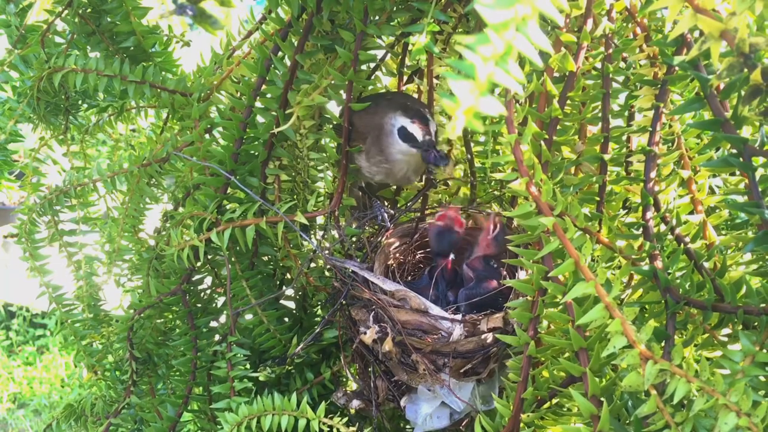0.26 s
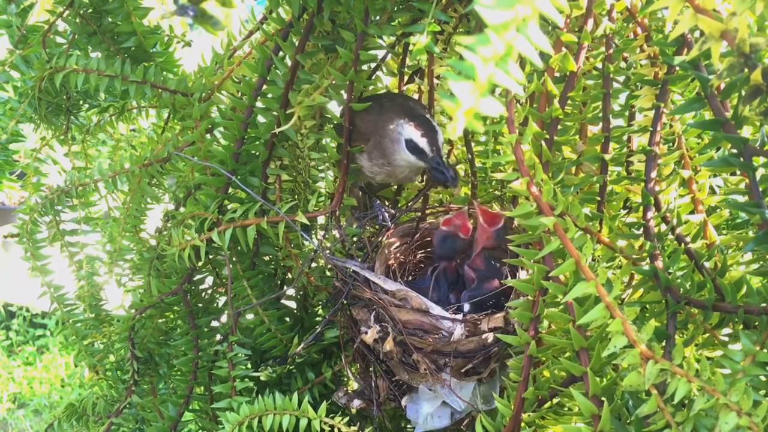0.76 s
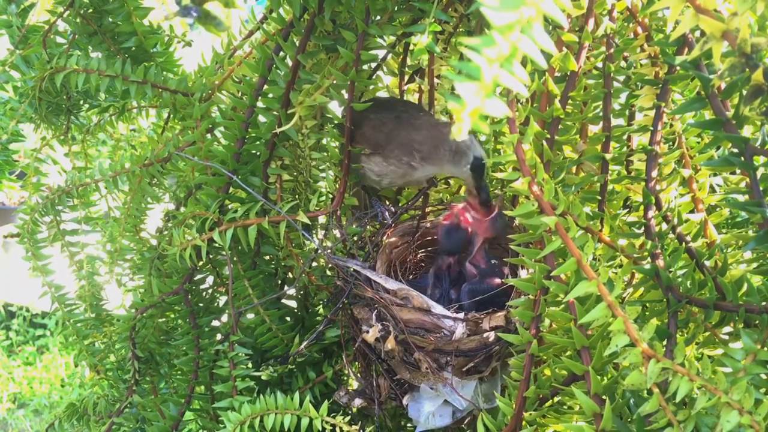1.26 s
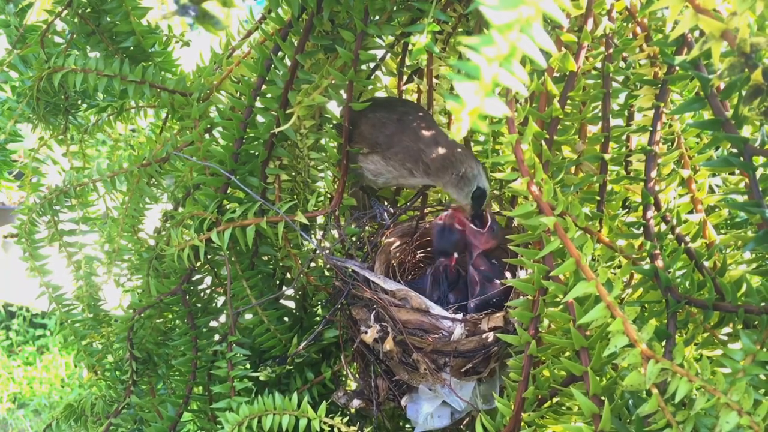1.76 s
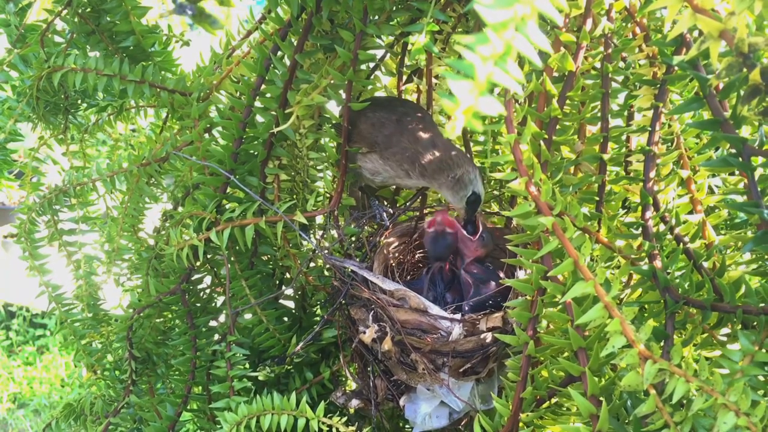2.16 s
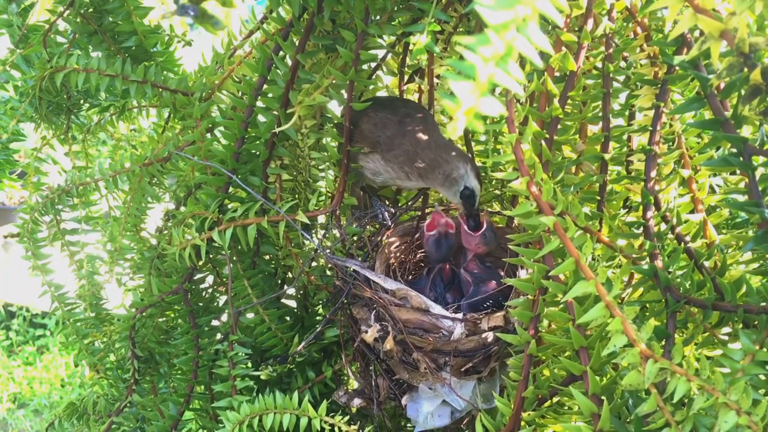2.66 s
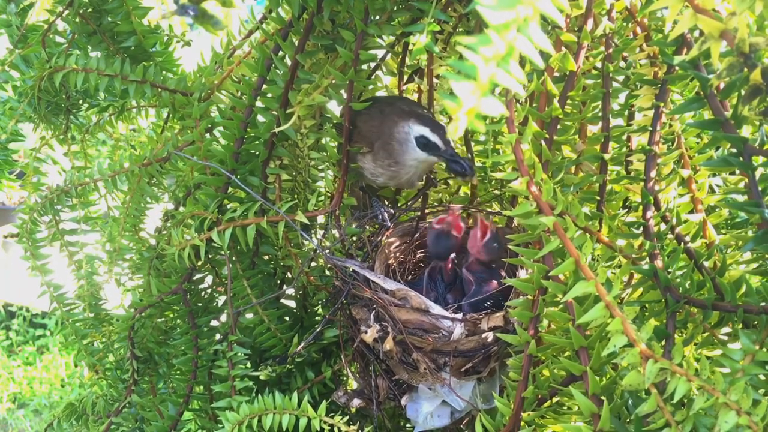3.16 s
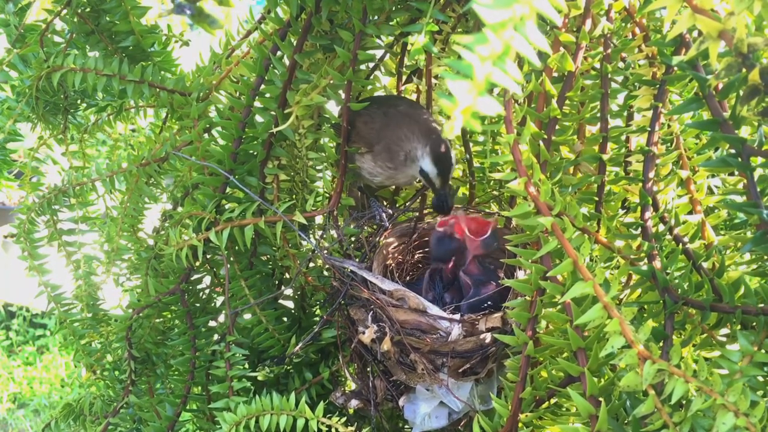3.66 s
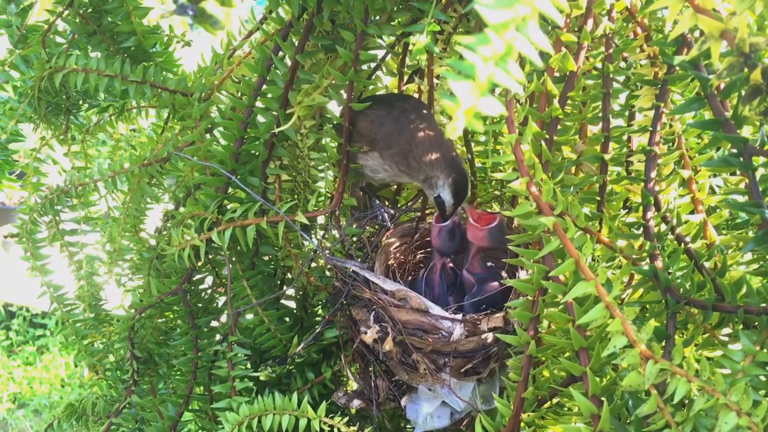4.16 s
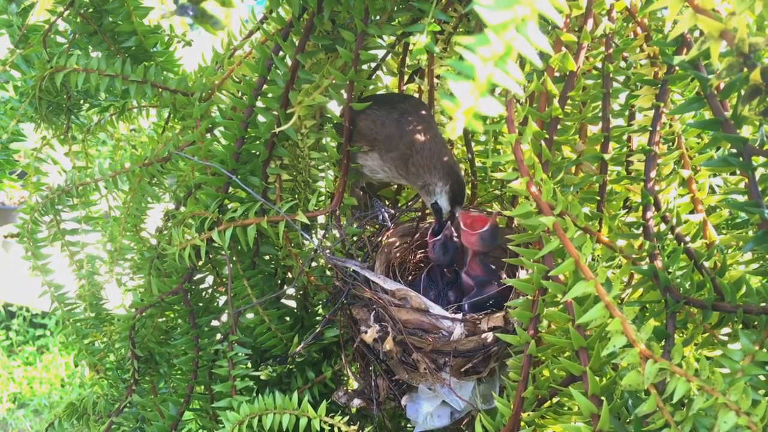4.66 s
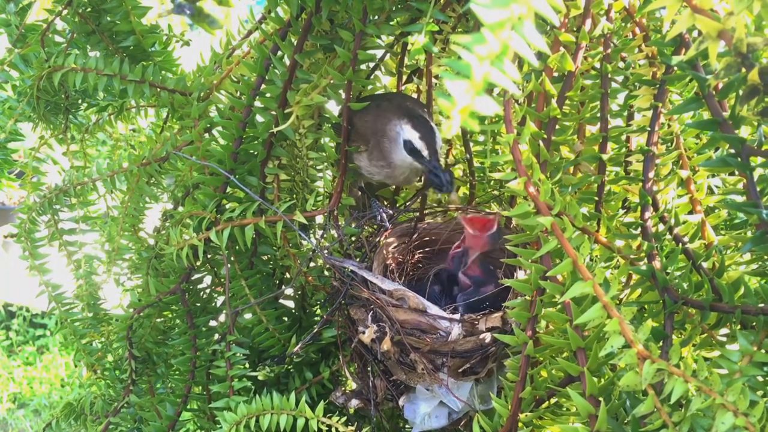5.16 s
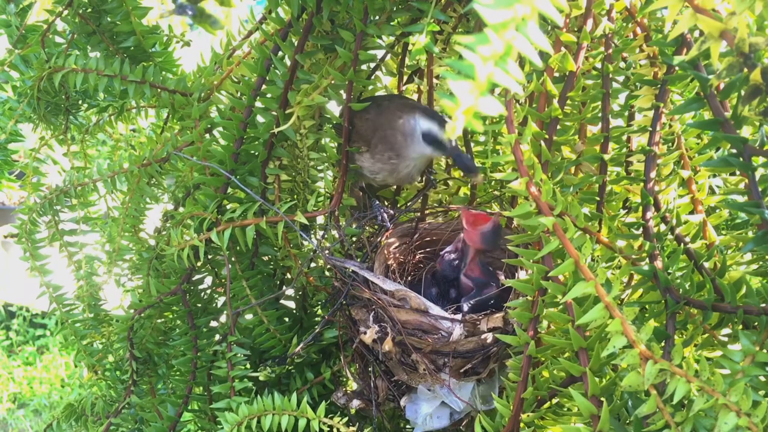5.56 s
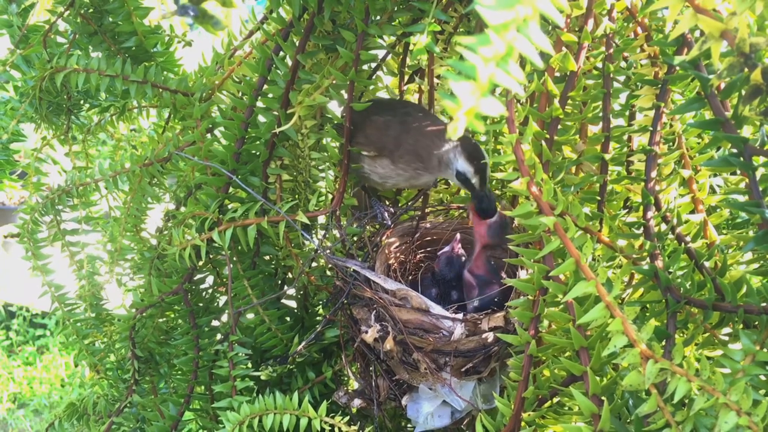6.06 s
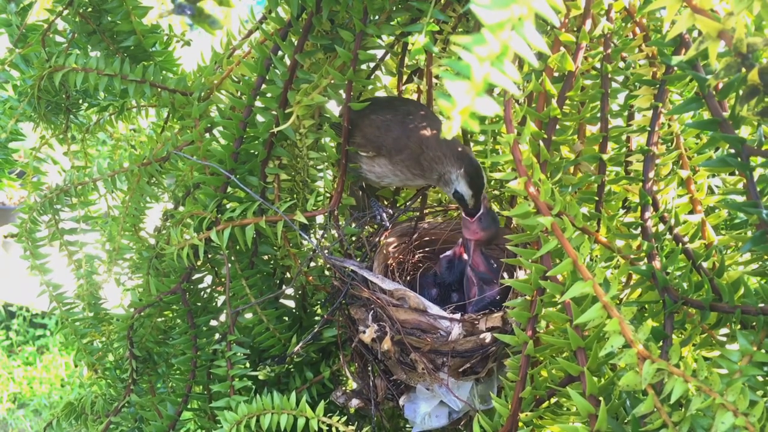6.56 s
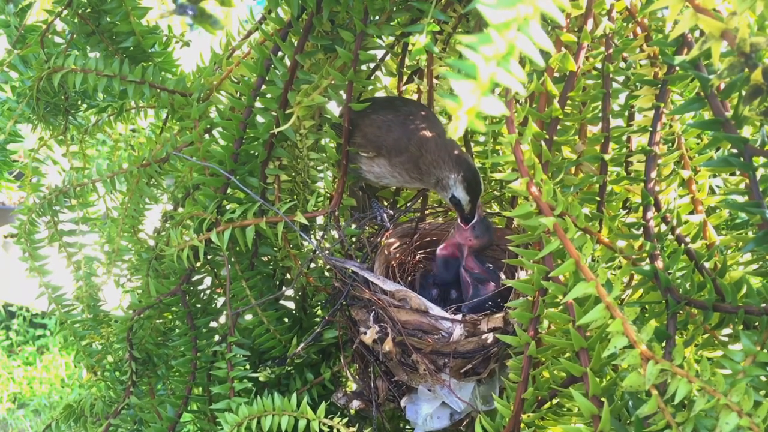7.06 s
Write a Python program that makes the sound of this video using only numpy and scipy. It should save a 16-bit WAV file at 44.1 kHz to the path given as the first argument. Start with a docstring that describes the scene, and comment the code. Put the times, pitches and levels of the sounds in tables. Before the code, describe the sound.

Close high-pitched begging from baby birds rises in quick squeaks, with faint leaf rustles, one dry click, distant engine rumble and steady fast ticking.

```python
"""Over a low outdoor rumble with an engine drone (noise and a gliding sine) and a steady hiss (shaped noise), a
buzz pulses ten times a second: one cycle of damped rings and noise, repeated. Ferns rustle (noise bursts), then
nestlings beg as a parent feeds them: two beating voices climb from a faint rasp to a thin whistle. Softer
wavering peeps of two voices come between the calls. One long, fluttering sine whistle then falls for two
seconds; later comes one dry click, a pair of damped rings."""
import sys
import numpy as np
from scipy import signal
from scipy.fft import rfft, irfft, next_fast_len
from scipy.io import wavfile
from scipy.ndimage import uniform_filter1d, map_coordinates

SR = 44100
rng = np.random.default_rng(int(sys.argv[2]) if len(sys.argv) > 2 else 0)


def log_audio(samples):
    """Write samples as a 16-bit WAV file to the path given in sys.argv[1]."""
    # one column per channel
    frames = np.atleast_2d(samples).T
    # limit to full scale, then quantise
    limited = np.clip(frames, -1, 1)
    pcm = np.round(limited * 32767).astype(np.int16)
    wavfile.write(sys.argv[1], SR, pcm)


N = 322812
T = np.arange(N) / SR  # s

# level curve of the low rumble: time_s, relative_level_db
RUMBLE_LEVEL = [(0.0, -32.5), (0.15, -32), (0.45, -37), (0.9, -31.5), (1.75, -35), (2.1, -31), (2.3, -36.6),
                (2.6, -32), (2.8, -36.5), (3.0, -31.9), (4.61, -38), (4.81, -30.5), (5.06, -36),
                (5.81, -36.5), (6.21, -32), (6.86, -36), (7.06, -33.5), (7.31, -33.5)]
# distant engine: time_s, pitch_hz (before a small drift), level_db (before a slow wavering)
ENGINE_DRONE = [(0, 63.1, -35.5), (1.2, 62.3, -33), (1.6, 65.66, -39.5), (2.1, 66, -32.5), (2.5, 64, -48),
                (3.3, 64.86, -34.5), (3.8, 66.24, -43.5), (6.6, 65.97, -59), (7.3, 66, -40)]
# noise spectra of the rumble, the low wash of the surroundings, the air and the hiss:
# frequency_hz, relative_density_db (per Hz)
RUMBLE_SPECTRUM = [(22, -27), (31, -18), (46, -4.5), (90, 0), (125, -8.5), (200, -26)]
WASH_SPECTRUM = [(110, -0.5), (145, -2), (200, -7), (255, -15), (380, -17.5), (480, -34.5)]
AIR_SPECTRUM = [(400, 5), (700, 2.5), (790, 4), (900, 3.5), (1300, 2.5), (1600, -2.5), (2200, 5.5),
                (2650, -1.5), (3500, -0.5), (4500, -8), (7500, -4), (16000, -24)]
HISS_SPECTRUM = [(2000, -28), (5000, -8), (7600, -9), (8700, 2), (9800, 2), (10350, -4.5), (11000, 1.5),
                 (15800, 1)]

# taps within one cycle of the buzz: start_s (into the cycle), ring_hz, relative_level_db
BUZZ_TAPS = [(.001, 2190, -34), (.0065, 2290, -39.5), (.0085, 1400, -40), (.016, 800, -39),
             (.0225, 790, -41), (.0255, 1450, -38), (.0255, 2220, -34), (.0315, 2360, -36),
             (.0465, 1500, -41), (.0505, 2230, -42), (.059, 2150, -40), (.0695, 800, -41.5),
             (.0905, 2130, -32.5)]
# noise spectrum of the buzz's rasp: frequency_hz, relative_density_db (per Hz)
BUZZ_SPECTRUM = [(520, -10.5), (660, -0.5), (790, -1.5), (1050, -0.5), (1330, -5), (1450, 2), (1800, 0),
                 (2200, 3.5), (2480, -5), (2700, -5), (4200, -12)]
# steady tones beside the buzz: pitch_hz, relative_level_db
STEADY_TONES = [(375, -68.5), (797, -58.5), (1411, -62.5), (1718, -58.5)]
CYCLE_HZ = 10.22806  # cycles of the buzz per second
TAP_T60_S, TAP_ATTACK_S = .019, .0004

# rustles of ferns and nest: center_s, half_length_s (to 1/e of the peak), level_db
RUSTLE_BURSTS = [(0.272, 0.057, -54.5), (0.833, 0.075, -51.5), (1.275, 0.08, -47), (4.381, .04, -55),
                 (4.572, 0.0087, -44)]

# begging calls: crest_s, lead_in_s, fall_s, pace (stretch of the gesture, 1 = usual), lead_in_level_db,
# first_surge_hz, first_surge_db, first_roughness (0-1), dip_db (between the surges),
# second_surge_hz, second_surge_db, second_roughness (0-1), crest_hz, crest_db, end_hz,
# overtone_db (re the voice, at its strongest), beak_narrows_s (from the crest); other levels are relative
BEGGING_CALLS = [(.538, .108, 0.04, .97, -51, 5150, -47.5, 0.42, -7, 5780, -39, .06, 6250, -42.5, 5150, -0.5, 0.015),
                 (1.218, .122, 0.038, 0.89, -50.5, 5450, -37.5, 0.4, -16, 5870, -31, 0.2, 6390, -32.5, 5650, -5, -0.08),
                 (2.974, 0.11, 0.029, 0.91, -44, 5270, -39.5, 0.2, -5, 5820, -33, 0.13, 6400, -37, 5050, 1.5, -0.061),
                 (3.581, 0.13, 0.035, .95, -48.5, 5280, -39, 0.09, -6, 5720, -34.5, 0.07, 6470, -37.5, 5160, 1.5, -0.025),
                 (4.17, 0.16, 0.038, 0.97, -45, 5800, -32, 0.55, -2.5, 6060, -26, 0.14, 6650, -32.5, 5570, -4, -0.089),
                 (4.781, .16, 0.036, 1.12, -47, 5620, -33, 0.5, -3.5, 6020, -27, 0.1, 6630, -34, 5600, -1.5, -.095),
                 (5.002, 0.056, 0.033, 1, -47, 5010, -44, 0.3, -4.5, 5680, -33, .45, 6280, -32, 5580, -20, -0.025),
                 (5.643, .152, 0.041, 1, -49, 5630, -35.5, 1, -5, 5800, -28, 0.06, 6630, -29, 6300, -6, -0.08),
                 (6.254, 0.18, .024, 1.2, -50, 5950, -35.5, .7, -15, 5780, -32.5, 0.42, 6560, -39, 5900, -17, -.02)]
# gesture shared by the calls, two surges that each end in a rough break, then a crest:
# from_crest_s (at pace 1), pitch_sag_hz, split_hz (lower voice below upper), level_offset_db,
# roughness (0-1), dip_share (0-1, of the call's dip)
BEGGING_GESTURE = [(-.065, 79, 603, -1.5, .1, 0), (-.051, -2, 710, 0.5, .22, 0),
                   (-.042, 480, 900, 1.5, 0.57, 1), (-.032, 0, 747, 0.5, .02, 0.02),
                   (-.016, 52, 780, -2, 0.2, 0), (-.009, 230, 964, 1, .42, 0),
                   (0, 0, 1240, 2.5, 0.12, 0.15)]
# anchors of the gesture, first surge, start and end of the second, crest: from_crest_s (at pace 1)
SURGE_TIMES = [-.051, -.032, -.016, 0]
# The climb starts from a slack note, LEAD_DB re the lead-in level, and has grown raspy by the knee.
LEAD_HZ, LEAD_DB, LEAD_ROUGH = 3965, -6, .15
LEAD_SPLIT_HZ = 450  # lower voice below the upper
KNEE_S, KNEE_HZ, KNEE_ROUGH = -.077, 4830, 0.49  # time from the crest at pace 1
# The fall keeps its strength for this share of its length, then dies; levels are re the crest.
FALL_HOLD, FALL_HOLD_DB, FALL_END_DB = 0.64, -3, -15
FALL_SPLIT_HZ, FALL_ROUGH = 1150, .03  # clean, with the lower voice far below
# Overtones grow as the beak opens and fade as it narrows, down to a floor in dB re the voice.
OPEN_DB_PER_S, NARROW_DB_PER_S, NARROW_DB = 54, 650, -26.5

# soft peeps: start_s, length_s, from_hz, to_hz, from_db, to_db (relative levels), flutter_hz (pitch swing),
# second_voice_hz (re the first), overtone_db (re the voice)
SOFT_PEEPS = [(0.552, .095, 4550, 5400, -52, -51, 220, -700, -14),
              (1.599, .1, 7500, 7230, -56, -53, 20, 203, -25),
              (1.68, 0.067, 5400, 5650, -50, -51, 440, -950, -20),
              (1.782, .105, 4930, 5560, -51, -46.5, 200, 602, -20),
              (2.222, 0.063, 4010, 4570, -39, -42, 120, 550, -12),
              (2.288, .07, 5440, 5760, -42, -51, 270, -800, -9),
              (2.44, 0.094, 4750, 5430, -47, -49, 225, 600, -20),
              (3.245, .085, 4880, 5750, -43, -46, 200, 600, -25),
              (3.91, 0.11, 5500, 6530, -43, -39.5, 200, -500, -22),
              (6.328, 0.058, 5220, 5400, -47, -50, 35, 150, 0.5),
              (6.382, 0.055, 5400, 6160, -43, -44, 65, 600, 0),
              (6.975, .088, 4970, 5800, -47, -49, 150, 450, -20)]
FLUTTER_HZ, PEEP_EDGE_DB = 33.1, 7  # rate of the pitch waver; softening at both ends
PEEP_SECOND_DB, PEEP_ROUGH = -7.5, 0.25  # second voice re the first; roughness 0-1

# long thin whistle: time_s, pitch_hz (before a small flutter)
WHISTLE_GLIDE = [(1.7, 8600), (2.052, 7770), (2.284, 7662), (2.58, 7700), (2.704, 7450), (2.876, 7430),
                 (3.192, 6923), (3.56, 6650)]
WHISTLE_PEAK_S, WHISTLE_DB = 2.9, -51  # loudest moment, and its level before the flutter
WHISTLE_SWELL_DB_PER_S, WHISTLE_FADE_DB_PER_S = 6, 5

# dry click: start_s, ring_hz, level_db (before the attack and decay)
CLICK_RINGS = [(5.5207, 1590, -23), (5.5215, 398, -26.5)]
TOP_HZ = 15800  # upper band limit


def amp(db):
    """Level law: decibels to amplitude gain."""
    return 10 ** (np.asarray(db) / 20)


def unit(x):
    """Power normalization: scale to rms 1."""
    return x / np.sqrt(np.mean(np.abs(x) ** 2) + 1e-20)


def curves(rows, t=T):
    """Linear interpolation: one value per sample for each column after the time."""
    s, *cols = np.transpose(rows)
    return [np.interp(t, np.sort(s), c) for c in cols]


def wobble(rate, size=N):
    """Band-limited fluctuation: a smooth random curve through rate knots a second."""
    knots = rng.standard_normal(int(size * rate / SR) + 4)
    return map_coordinates(knots, [np.arange(size) * rate / SR])


def noise(spectrum, size=N):
    """Spectral shaping: random-phase noise of rms 1 whose density follows (Hz, dB) and falls off outside."""
    hz = np.fft.rfftfreq(size, 1 / SR) + 1
    f, db = np.transpose(spectrum)
    outside = np.minimum(1, np.minimum(hz / f[0], f[-1] / hz)) ** 2
    gain = outside * amp(np.interp(np.log(hz), np.log(f), db))
    random_phase = np.exp(2j * np.pi * rng.random(len(hz)))
    return unit(irfft(gain * random_phase, size))


def phase(hz):
    """Frequency modulation: phase in radians is the running integral of frequency."""
    return 2 * np.pi * np.cumsum(hz) / SR


def rings(rows, t, t60, attack):
    """Damped resonance: each (s, Hz, dB) row starts a sine that decays by 60 dB in t60 seconds."""
    out = np.zeros(len(t))
    for s, hz, db in rows:
        u = np.maximum(t - s, 0)
        decay = amp(db - 60 * np.minimum(u / t60, 10))
        out += decay * (1 - np.exp(-u / attack)) * np.sin(2 * np.pi * hz * u)
    return out


def span(rows, fade):
    """Gating: the sample indices of a call, and a gain that ramps in and out over fade seconds."""
    start, end = rows[0][0], rows[-1][0]
    at = np.flatnonzero((T > start) & (T < end))
    return at, np.clip(np.minimum(T[at] - start, end - T[at]) / fade, 0, 1)


def outdoors():
    """Superposition of sources: a swelling rumble with an engine drone in it, over steady air and hiss."""
    rumble_db, = curves(RUMBLE_LEVEL)
    hz, drone_db = curves(ENGINE_DRONE)
    roar = noise(RUMBLE_SPECTRUM)
    # levelled over a quarter second, so that its slow swells come from the level curves
    roar = roar / np.sqrt(np.abs(uniform_filter1d(roar ** 2, SR // 4)))
    drone = amp(drone_db + 1.6 * wobble(7)) * unit(np.sin(phase(hz + 1.494 * wobble(7))))
    # the drone takes its power out of the whole low level
    roar_share = np.sqrt(np.clip(1 - amp(drone_db - rumble_db) ** 2, .35, 1))
    rumble = amp(rumble_db - 0.6) * roar_share * roar
    wash = amp(-43.0) * noise(WASH_SPECTRUM)
    air = amp(-49.5) * noise(AIR_SPECTRUM)
    hiss = amp(-47.0) * noise(HISS_SPECTRUM)
    return rumble + drone + wash + air + hiss


def buzz():
    """Periodic excitation: every cycle repeats the same taps and the same noise rasp, which swells once a
    cycle."""
    size = round(SR / CYCLE_HZ)
    t = np.arange(2 * size) / SR
    taps = rings(BUZZ_TAPS, t, t60=TAP_T60_S, attack=TAP_ATTACK_S)
    taps = taps.reshape(2, size).sum(axis=0)  # ring tails carry over into the next cycle
    swell_db = 2 * np.cos(2 * np.pi * CYCLE_HZ * (t[:size] - .018))
    buzz_noise = amp(-50.0 + swell_db) * noise(BUZZ_SPECTRUM, size=size)
    cycle = 0.87 * taps + buzz_noise
    chatter = map_coordinates(cycle, [T * CYCLE_HZ % 1 * size], mode="grid-wrap")
    hum = np.zeros(N)
    for hz, db in STEADY_TONES:
        hum += amp(db) * unit(np.sin(2 * np.pi * (hz * T + rng.random()) + 0.29 * wobble(20)))
    return chatter * amp(.8 * wobble(60)) + hum * (.85 + .35 * wobble(40))


def rustling():
    """Friction noise: fronds rustle as the parent shifts, as flickering treble under bell-shaped swells."""
    swell = sum(amp(db) * np.exp(-((T - s) / half) ** 2) for s, half, db in RUSTLE_BURSTS)
    treble = noise([(3000, 5), (7000, 10), (9000, 5), (15000, -9)])
    return swell * unit(amp(4.4 * wobble(200)) * treble)


def syrinx(hz, other_hz, other_db, rough, overtone_db, warble, chaos_rate, jitter):
    """Coupled oscillators: two membranes beat, each wavering on its own; pushed hard, they scatter into a rasp."""
    size = len(hz)
    rough = np.clip(rough, 0, 1)
    drift = 1 + jitter * wobble(718, size=size)  # shared by both membranes
    upper = np.exp(1j * phase(hz * drift * (1 + warble * wobble(380, size=size))))
    lower = np.exp(1j * phase(other_hz * drift * (1 + warble * wobble(380, size=size))))
    chaos = unit(wobble(chaos_rate, size=size) + 1j * wobble(chaos_rate, size=size))
    pair = (upper + amp(other_db) * lower) / np.hypot(1, amp(other_db))
    voice = pair * (np.sqrt(1 - rough ** 2) + rough * chaos)
    # the membranes mix into sum tones
    overtones = voice * (0.77 * upper + amp(other_db) * lower + 0.39 * upper * lower)
    return np.sqrt(2) * (voice + amp(overtone_db) * overtones).real


def beg(crest_s, lead_s, fall_s, pace, lead_db, first_hz, first_db, first_rough, dip_db,
        second_hz, second_db, second_rough, crest_hz, crest_db, end_hz):
    """Gesture scaling: climb, surges and fall of one call as rows of (s, upper Hz, dB, lower Hz, roughness)."""
    start = (crest_s - lead_s, LEAD_HZ, lead_db + LEAD_DB, LEAD_HZ - LEAD_SPLIT_HZ, LEAD_ROUGH)
    knee = (crest_s + pace * KNEE_S, KNEE_HZ, lead_db, KNEE_HZ - LEAD_SPLIT_HZ, KNEE_ROUGH)
    climb = [start, knee] if start[0] < knee[0] else np.empty((0, 5))  # a hurried call skips the climb

    s, sag_hz, split_hz, offset_db, rough, dip_share = np.transpose(BEGGING_GESTURE)

    def surges(first, second, crest):
        """Linear interpolation between the two surges and the crest."""
        return np.interp(s, SURGE_TIMES, [first, second, second, crest])

    hz = surges(first_hz, second_hz, crest_hz) - sag_hz
    db = surges(first_db, second_db, crest_db) + offset_db + dip_share * dip_db
    roughness = np.hypot(rough, surges(first_rough, second_rough, 0))
    body = np.column_stack([crest_s + pace * s, hz, db, hz - split_hz, roughness])

    share = np.array([FALL_HOLD, 1])
    fall_hz = crest_hz + share * (end_hz - crest_hz)
    fall_db = crest_db + np.array([FALL_HOLD_DB, FALL_END_DB])
    fall = np.column_stack([crest_s + share * fall_s, fall_hz, fall_db,
                            fall_hz - FALL_SPLIT_HZ, [FALL_ROUGH, FALL_ROUGH]])
    return np.array([*climb, *body, *fall])


def begging():
    """Membrane tension: loud calls waver, evenly doubled, while slack; when taut the upper voice takes over."""
    out = np.zeros(N)
    spray = noise([(2800, -3.0), (4000, 0.5), (7500, 2), (9500, -2.5), (12000, -11), (15500, -13)])
    for crest_s, *gesture, open_db, narrow_s in BEGGING_CALLS:
        call = beg(crest_s, *gesture)
        at, gate = span(call, fade=.004)
        hz, db, low_hz, rough = curves(call, T[at])
        t = T[at] - crest_s - narrow_s  # from the moment the beak narrows
        beak_db = np.minimum(OPEN_DB_PER_S * t, -NARROW_DB_PER_S * t)
        gape_db = np.maximum(open_db + beak_db, NARROW_DB)
        taut = np.clip((hz - 4700) / 900, 0, 1)
        waver = .02 * (1 - taut + rough)
        hz = hz * (1 + waver * wobble(130, size=len(at)))
        low_hz = low_hz * (1 + waver * wobble(130, size=len(at)))
        low_db = -4 - 0.011 * taut * np.abs(hz - low_hz)  # the further apart, the weaker the lower voice
        warble = .002 + .008 * (1 - taut) + .06 * rough ** 2
        voice = syrinx(hz, low_hz, low_db, rough, gape_db, warble, chaos_rate=1300, jitter=0.0042)
        # the rasp spreads over the whole treble
        rasp = (amp(-8.0) + amp(gape_db - 2.0)) * rough * spray[at]
        out[at] += gate * amp(db + 1.0) * (voice + rasp)
    return out


def peeping():
    """Vibrato and beating: soft peeps flutter as they glide, each doubled by a weaker second voice."""
    out = np.zeros(N)
    for start, length, from_hz, to_hz, from_db, to_db, flutter_hz, second_hz, overtone_db in SOFT_PEEPS:
        call = [(start, from_hz, from_db), (start + length, to_hz, to_db)]
        at, gate = span(call, fade=0.0035)
        hz, db = curves(call, T[at])
        t = T[at] - start
        db = db - PEEP_EDGE_DB * (2 * t / length - 1) ** 2
        hz = hz - flutter_hz * np.cos(2 * np.pi * FLUTTER_HZ * t)
        hz = hz * (1 + .012 * wobble(140, size=len(at)))
        voice = syrinx(hz, hz + second_hz, PEEP_SECOND_DB, PEEP_ROUGH, overtone_db,
                       warble=.007, chaos_rate=1000, jitter=0.0048)
        out[at] += gate * amp(db + 2.1 * wobble(147, size=len(at))) * voice
    return out


def long_whistle():
    """Frequency and amplitude modulation: a thin, fluttering sine sinks, swelling slowly and easing off."""
    hz, = curves(WHISTLE_GLIDE)
    t = T - WHISTLE_PEAK_S
    db = WHISTLE_DB + np.minimum(WHISTLE_SWELL_DB_PER_S * t, -WHISTLE_FADE_DB_PER_S * t)
    at, gate = span(WHISTLE_GLIDE, fade=0.024)
    flutter_db = 3 * wobble(60) + 2.5 * wobble(220)
    tone = amp(db + flutter_db) * unit(np.sin(phase(hz * (1 + 0.0083 * wobble(450)))))
    out = np.zeros(N)
    out[at] = gate * tone[at]
    return out


def clicking():
    """Impulse response: one dry click, made of two quickly damped rings."""
    return rings(CLICK_RINGS, T, t60=0.011, attack=.0004)


def foliage_scatter(birds):
    """Diffuse scattering: foliage returns a faint, brief noise tail of the calls, as a convolution."""
    t = np.arange(SR // 4) / SR
    tail = rng.standard_normal(len(t)) * amp(-60 * t / .2)  # falls by 60 dB in 0.2 s
    return amp(-27) * signal.fftconvolve(birds, tail / np.linalg.norm(tail))[:N]


def scene():
    """Linear superposition: the close birds and their scatter add to the sounds around them."""
    surroundings = outdoors() + buzz() + rustling() + clicking()
    birds = begging() + peeping() + long_whistle()
    return (surroundings + birds + foliage_scatter(birds))[None]


def record(dry):
    """Band limiting: nothing is kept at or above TOP_HZ."""
    size = next_fast_len(N + 8192)
    passband = np.fft.rfftfreq(size, 1 / SR) < TOP_HZ
    return irfft(rfft(dry, size) * passband, size)[:, :N]


dry = scene()
out = record(dry)
log_audio(out)
```